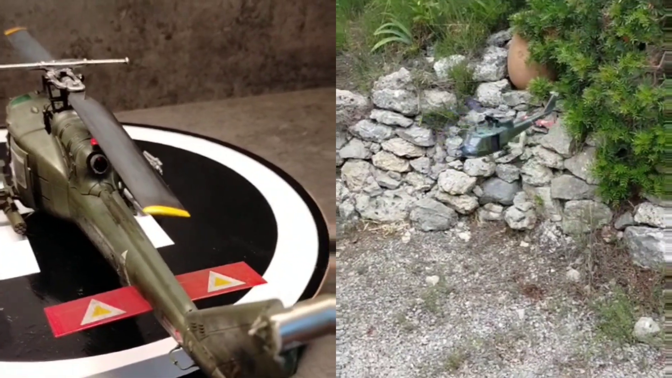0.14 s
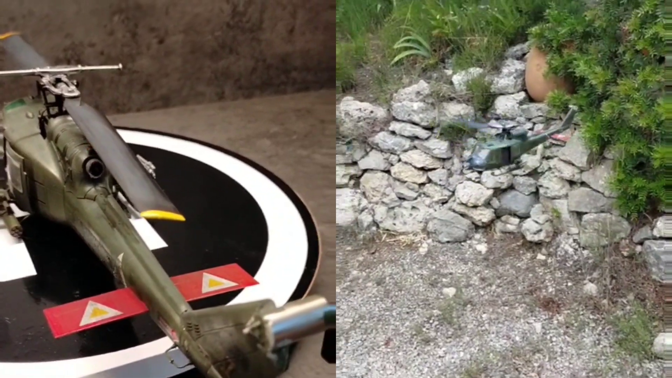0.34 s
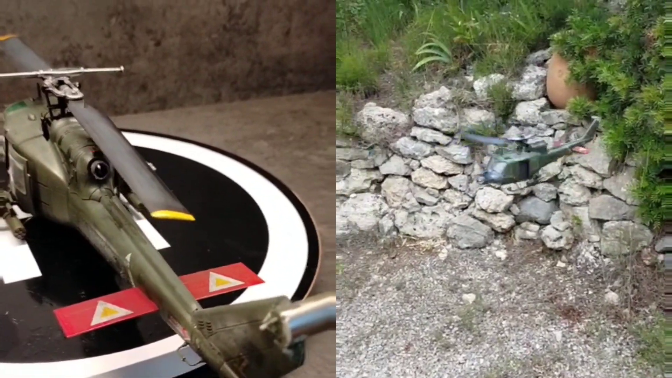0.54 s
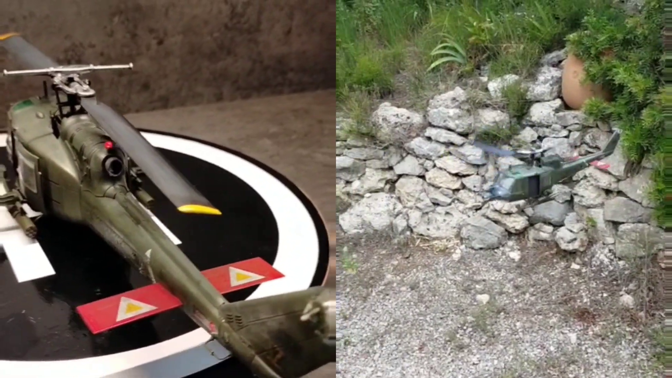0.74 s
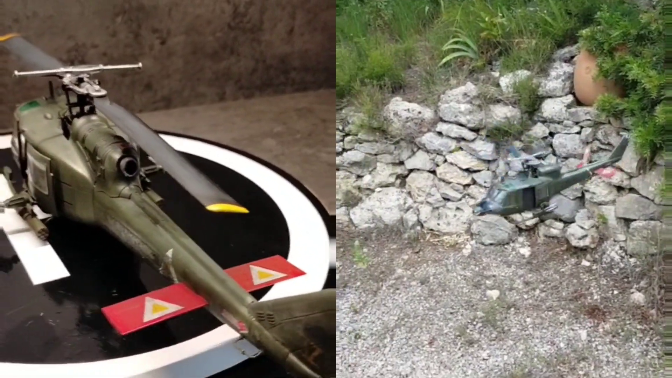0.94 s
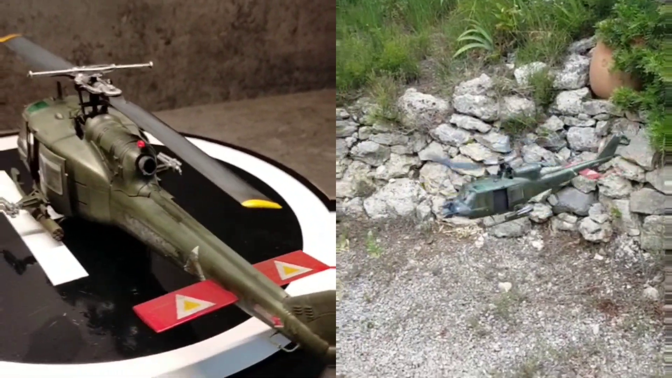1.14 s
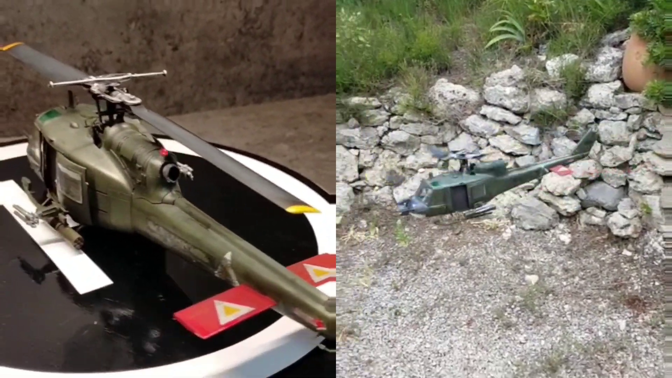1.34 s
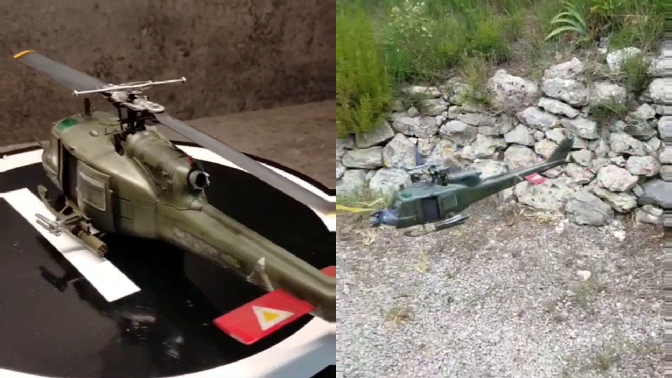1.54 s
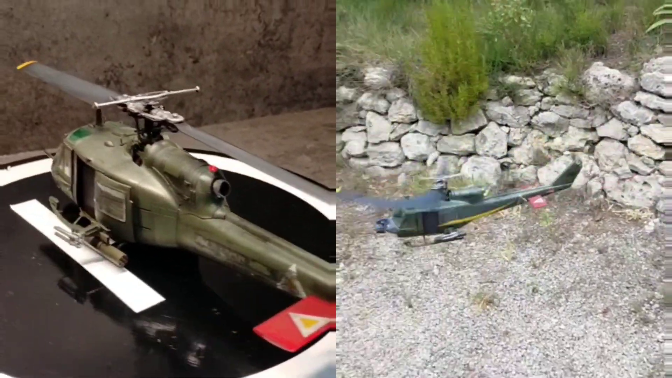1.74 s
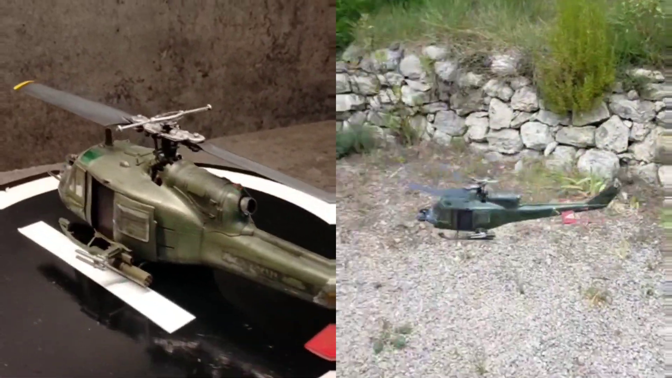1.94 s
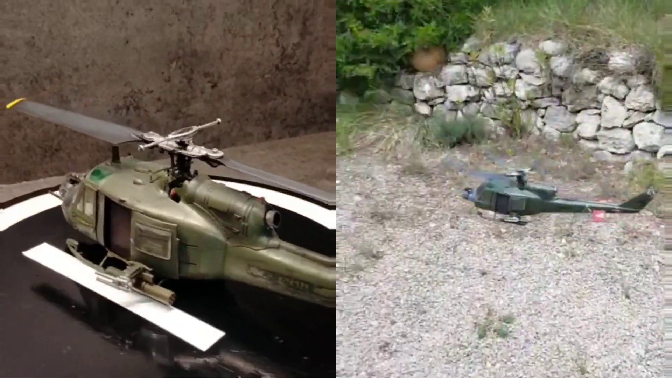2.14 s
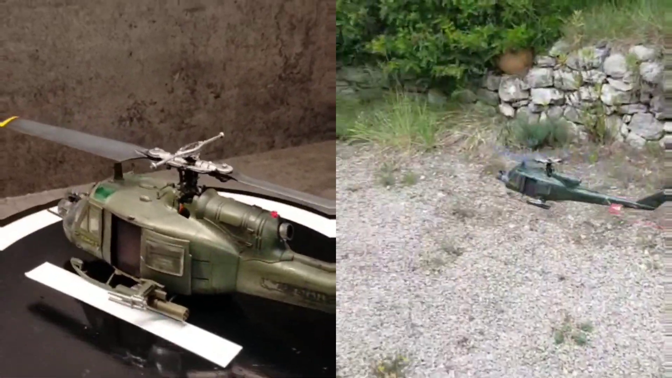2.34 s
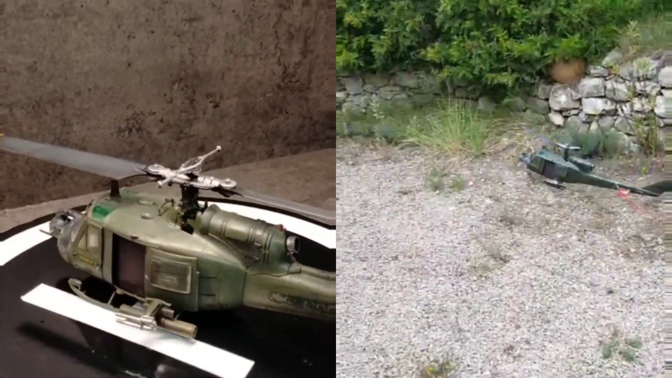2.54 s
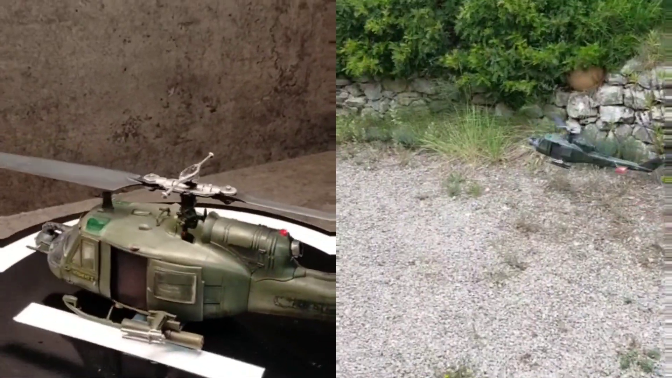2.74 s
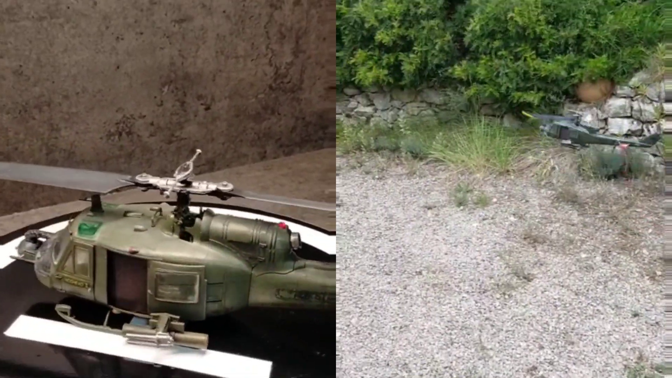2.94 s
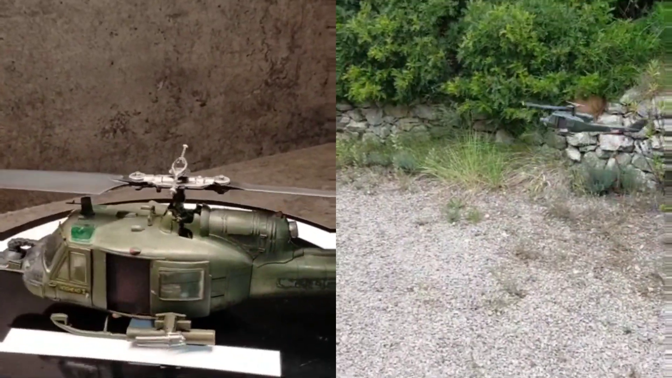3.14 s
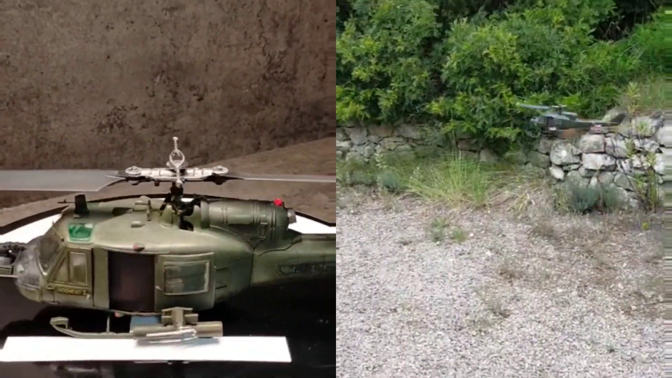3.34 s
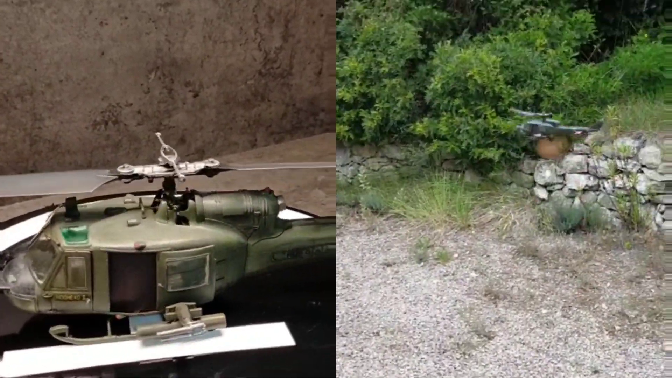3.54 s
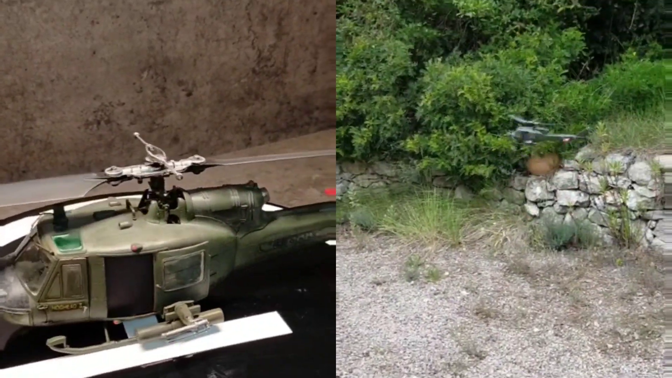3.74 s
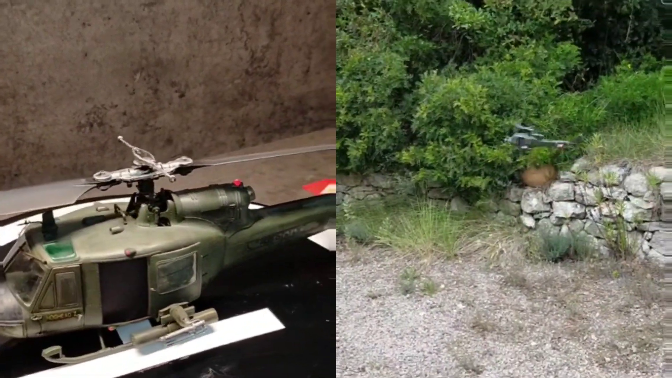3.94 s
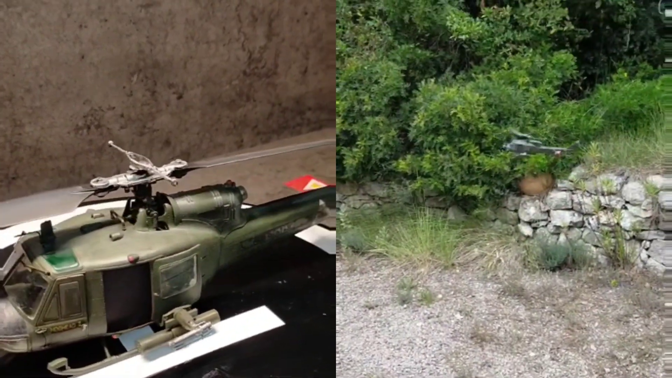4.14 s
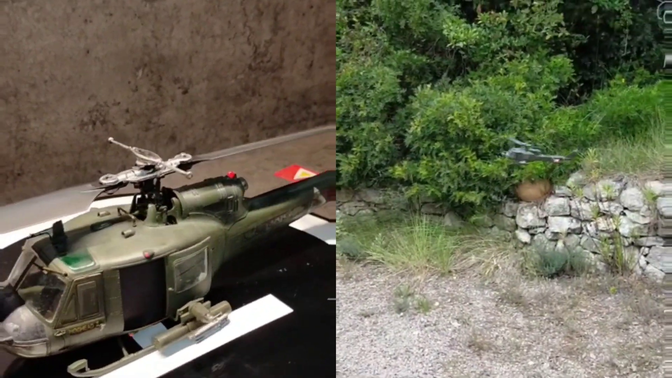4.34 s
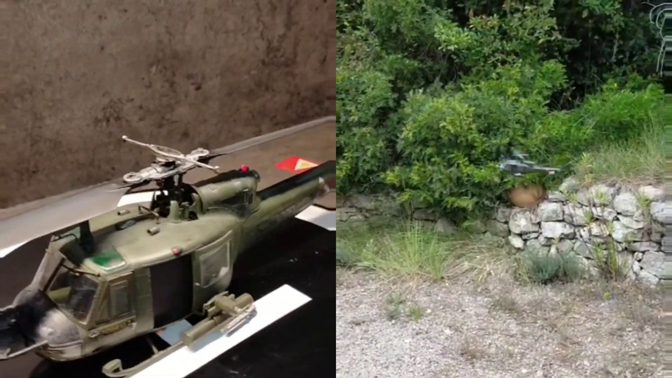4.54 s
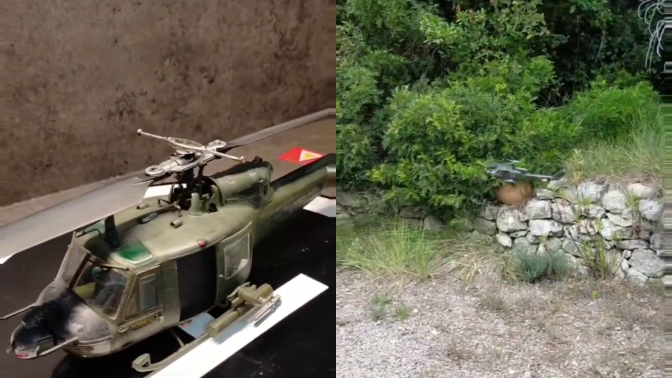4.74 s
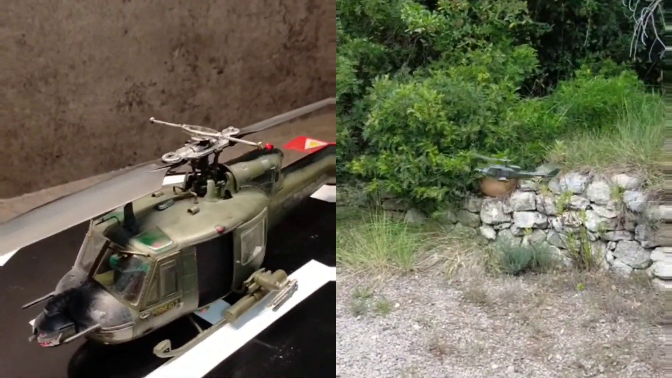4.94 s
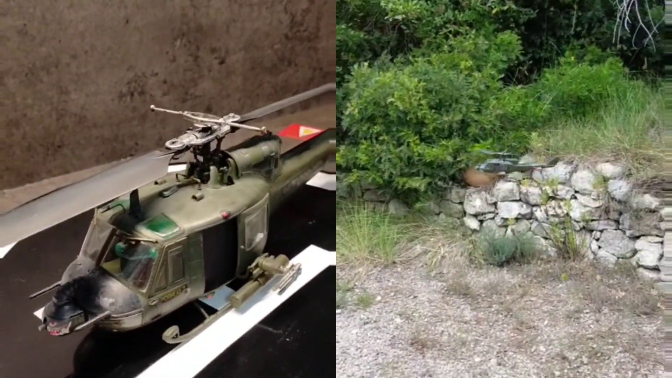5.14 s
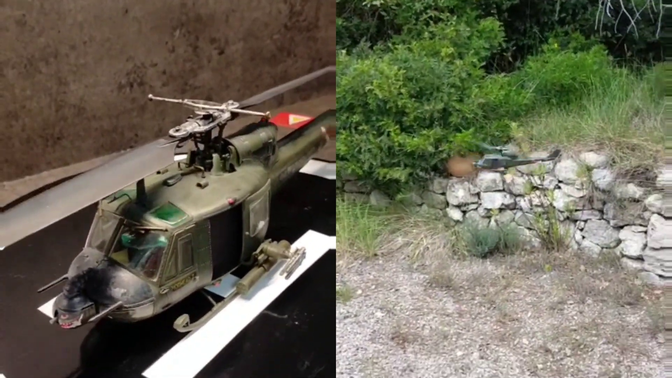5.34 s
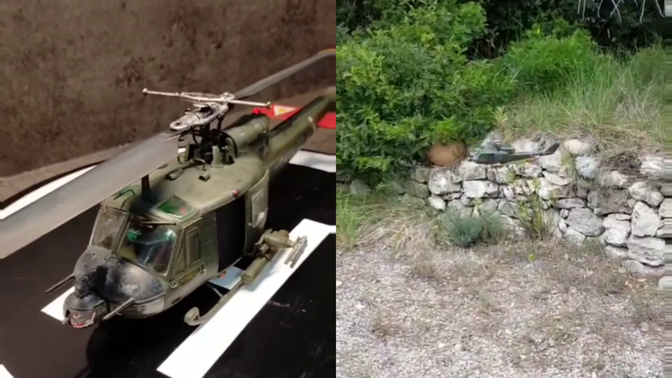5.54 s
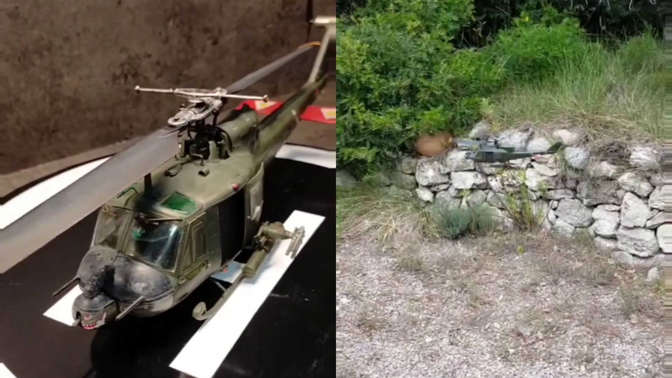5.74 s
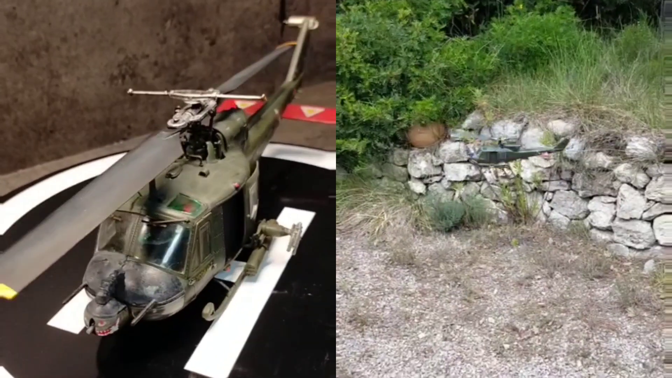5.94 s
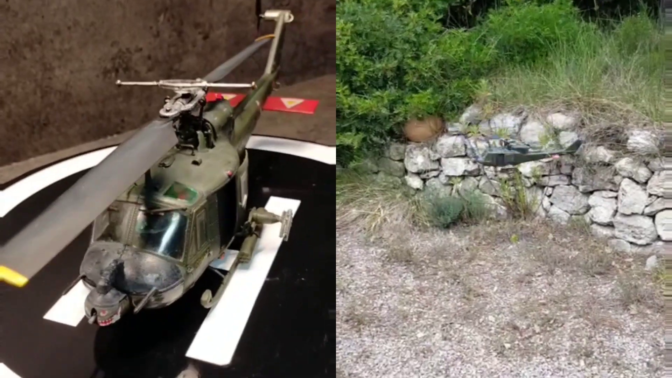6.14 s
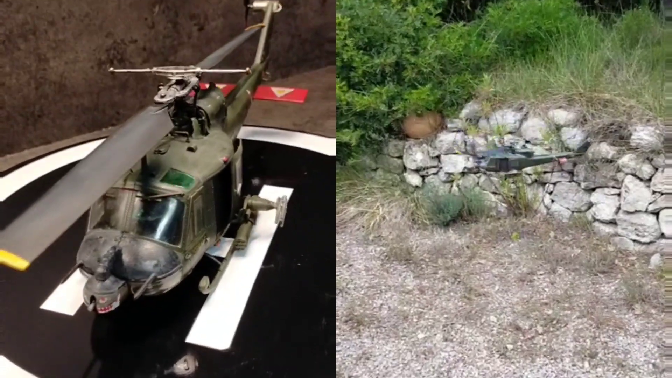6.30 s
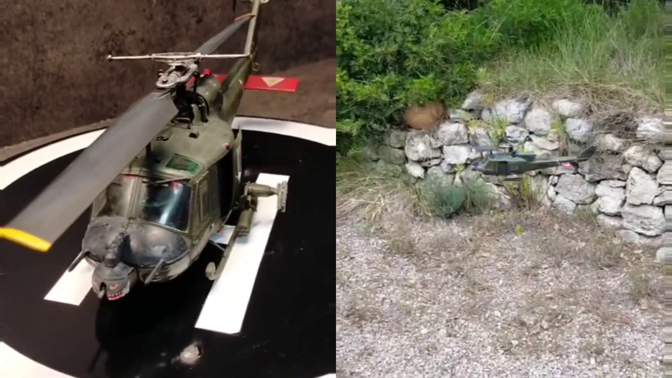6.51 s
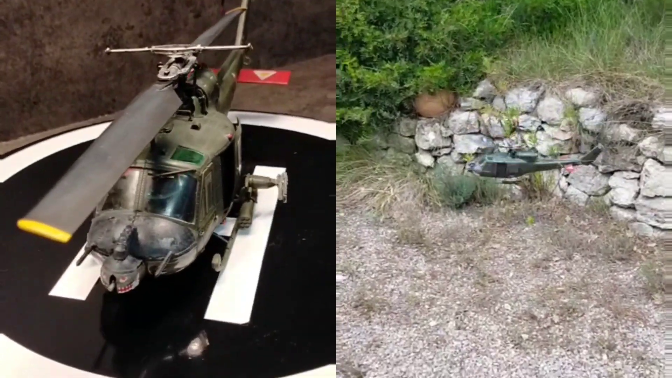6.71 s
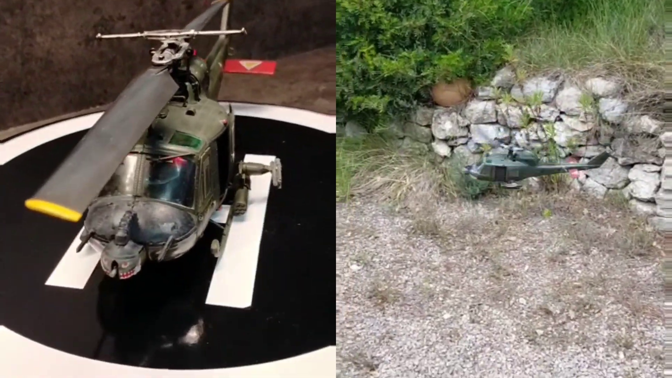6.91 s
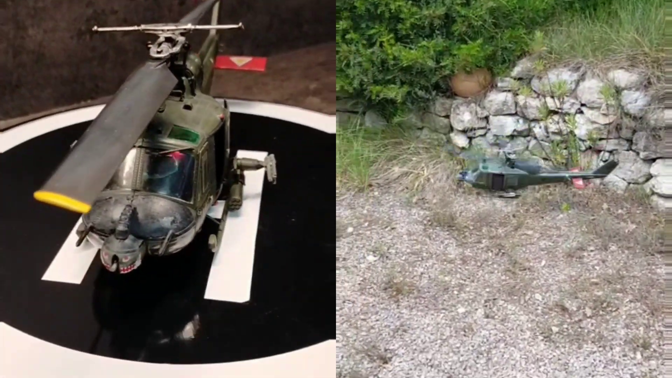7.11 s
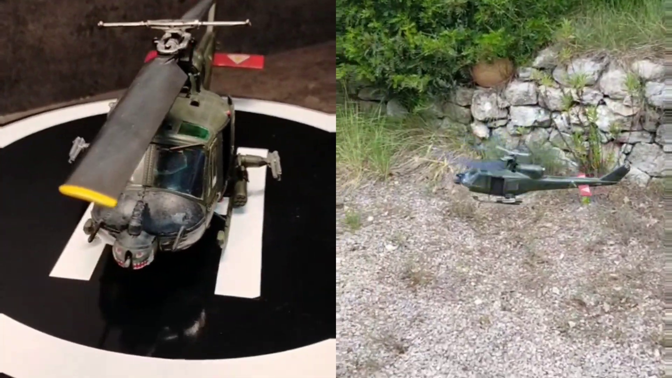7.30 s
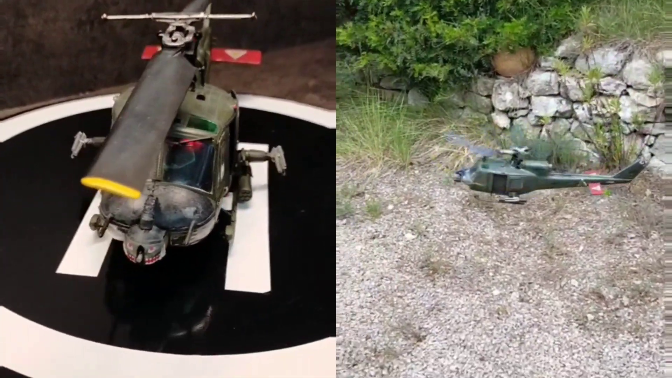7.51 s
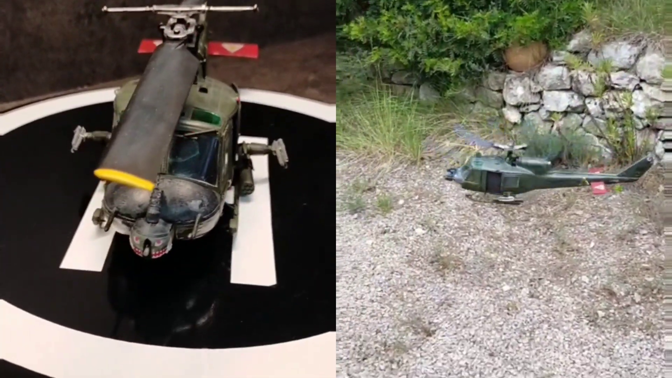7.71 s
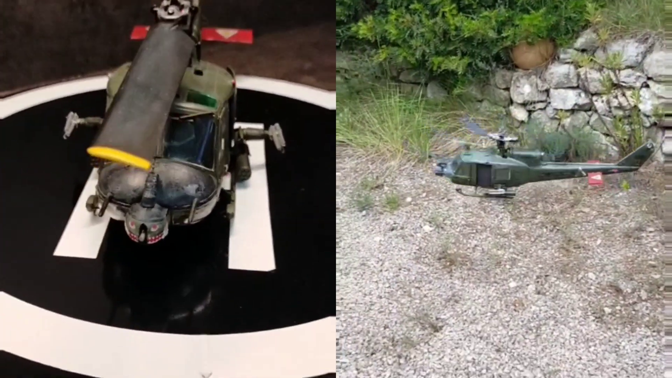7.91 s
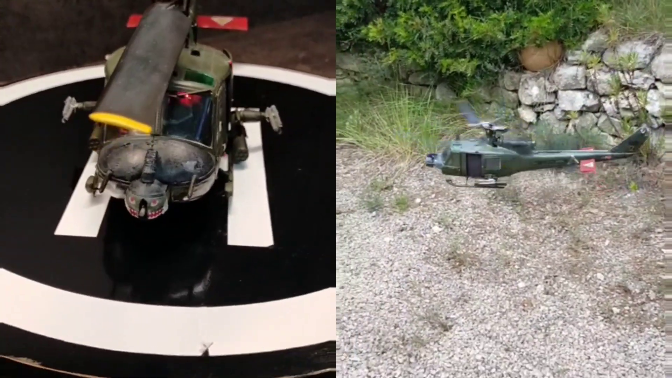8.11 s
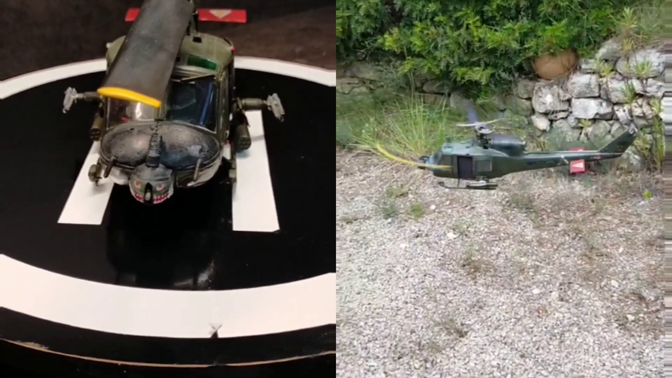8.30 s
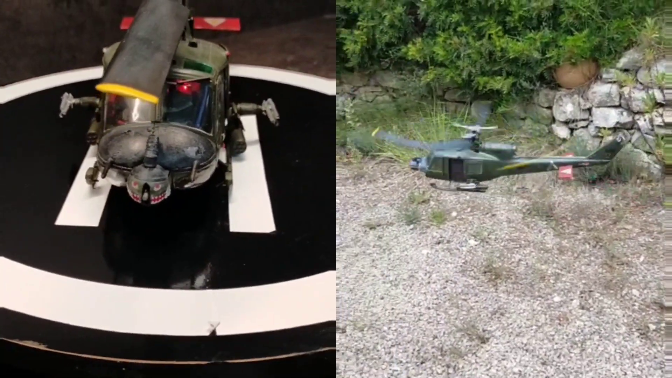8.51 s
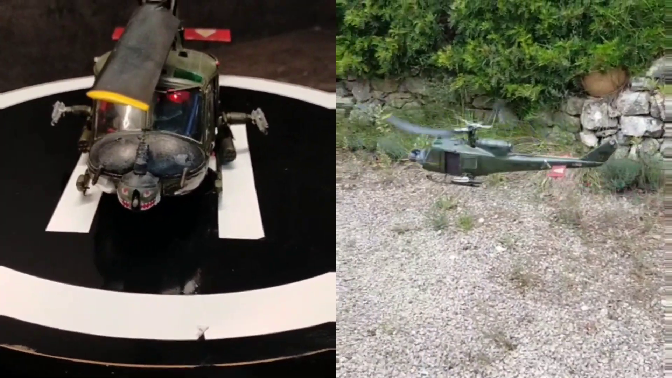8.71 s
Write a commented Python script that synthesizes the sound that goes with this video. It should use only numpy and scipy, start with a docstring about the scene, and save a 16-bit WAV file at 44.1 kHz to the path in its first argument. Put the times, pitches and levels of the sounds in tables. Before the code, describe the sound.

A small electric model helicopter flies outdoors with a high whine and whirring rotor blades, while wind gusts buffet the microphone.

```python
"""Outdoors over gravel: a small electric model helicopter drifts near and far.
One motor drives the two-blade main rotor through an 8:1 gear, so whine, blade slaps, rattle,
chopped air hiss and a low thrum all lock to the rotor. A separate tail rotor hunts in pitch
as it steers. Gusts buffet the microphone."""
import sys
import numpy as np
from scipy import signal
from scipy.fft import rfft, irfft, next_fast_len
from scipy.io import wavfile
from scipy.ndimage import uniform_filter1d

SR = 44100
rng = np.random.default_rng(int(sys.argv[2]) if len(sys.argv) > 2 else 0)


def wav_record(signal):
    """Record a signal, one row per channel, as 16-bit PCM in the file named by sys.argv[1]."""
    frames = np.transpose(np.atleast_2d(signal))
    bounded = np.clip(frames, -1, 1)
    # unit amplitude maps onto the largest positive 16-bit level
    quanta = np.round(bounded * 32767).astype(np.int16)
    wavfile.write(sys.argv[1], SR, quanta)


N = 386310
TIME = np.arange(N) / SR
FRAMES = TIME[::64]


def gain_of(db):
    return 10 ** (db / 20)


def unit_rms(x):
    return x / np.sqrt(np.mean(x ** 2) + 1e-20)


def curves(rows):
    """One signal per column after the time."""
    times_s, *columns = np.transpose(rows)
    return [np.interp(TIME, times_s, column) for column in columns]


def colour(x, eq):
    """Filter by (frequency [Hz], gain [dB]) points; output rms 1."""
    size = next_fast_len(N + 4096)
    hz, db = np.transpose(eq)
    bin_db = np.interp(np.log(np.fft.rfftfreq(size, 1 / SR) + 1), np.log(hz + 1), db)
    return unit_rms(irfft(rfft(x, size) * gain_of(bin_db), size)[:N])


def drift(hz):
    """Slow noise of rms 1, low-passed at hz."""
    knots_s = np.linspace(0, N / SR, 4096)
    spectrum = rfft(rng.standard_normal(len(knots_s)))
    bin_hz = np.arange(len(spectrum)) * SR / N
    return np.interp(TIME, knots_s, unit_rms(irfft(spectrum / (1 + (bin_hz / hz) ** 4))))


def crossfade(hz, count):
    """Drifting weights whose squares sum to 1."""
    weights = np.array([drift(hz) for _ in range(count)])
    return weights / np.sqrt((weights ** 2).sum(0))


def tone(cycles, rms_db, waver_rad):
    """Sine with wavering phase."""
    phase = 2 * np.pi * (cycles + rng.random()) + waver_rad * drift(6.5)
    return np.sqrt(2) * gain_of(rms_db) * np.cos(phase)


def pulse(rise_s, fall_s):
    """Lopsided Gaussian envelope."""
    t = np.arange(-500, 501) / SR
    return np.exp(-.5 * (t / np.where(t < 0, rise_s, fall_s)) ** 2)


def blade_passes(turns, lag_s=.00015, jitter_s=.00001, spread_db=1.6):
    """One click per pass; the second blade runs slightly late."""
    # slap strength by side shown: (time [s], first blade [dB], second blade [dB])
    bite = [(0, -6.5, -6), (.5, -3.5, -2.5), (1, -3, -7), (1.3, -2, -10), (1.6, 1.5, -15), (2, -1, -5),
            (2.4, -4.5, -1.5), (3, -2, -3), (3.6, -4, -5), (4.4, -5, -18), (5, -2.5, -2), (5.8, 2, -4.5),
            (6.6, 0.5, -4), (7.4, -1, -6), (8.1, 3, -1.5), (8.76, -4, -3.5)]
    at = np.flatnonzero(np.diff(np.floor(2 * (turns - .41))))
    blade = np.arange(len(at)) % 2
    timing, strength = rng.standard_normal((len(at), 2)).T
    bite_db = np.array(curves(bite))[blade, at]
    at += np.round((blade * lag_s + jitter_s * timing) * SR).astype(int)
    clicks = np.zeros(N)
    clicks[np.clip(at, 0, N - 1)] = gain_of(bite_db + spread_db * strength)
    return clicks


def slaps(clicks):
    """Each pass fires a short noise burst; four bursts cross-fade as the machine drifts."""
    # slap spectrum: (frequency [Hz], gain [dB])
    slap_eq = [(500, -35), (800, -12), (1400, -15.5), (2500, -1), (4000, -5), (5500, -3), (7100, -10.5),
               (7550, 12), (8000, 0), (10000, -25), (12000, -4.5), (14000, 10.5), (15000, 8), (16000, 0)]
    envelope = pulse(rise_s=.0009, fall_s=.0004)
    bursts = rng.standard_normal((4, len(envelope))) * envelope
    train = sum(signal.oaconvolve(clicks * weight, unit_rms(burst), "same")
                for weight, burst in zip(crossfade(hz=1.85, count=4), bursts))
    return colour(train, slap_eq)


def gear_rattle(turns, mismatch=.42):
    """Tooth errors repeat with rotor angle, nearly alike each half turn; five patterns cross-fade."""
    # drivetrain spectrum: (frequency [Hz], gain [dB])
    rattle_eq = [(500, -45), (800, -4.5), (1050, 4), (1180, -29), (1350, 5.5), (2600, -3.5), (4100, -2),
                 (5500, -4), (7000, -17), (7550, -1), (8600, -40), (10000, -2.5), (12000, 0.5), (14000, 19),
                 (16000, 7.5)]
    angle_turns = np.arange(1024) / 1024
    half_turn = rng.standard_normal((5, 512))
    patterns = np.tile(half_turn, 2) + mismatch * rng.standard_normal((5, 1024))
    errors = sum(weight * np.interp(turns % 1, angle_turns, pattern)
                 for weight, pattern in zip(crossfade(hz=1.6, count=5), patterns))
    return colour(errors, rattle_eq)


def air_hiss(turns, clicks):
    """Rushing air, chopped by each pass and louder in one half of the turn."""
    # air spectrum: (frequency [Hz], gain [dB])
    hiss_eq = [(180, -24.5), (300, -26), (767, -19), (967, -11.5), (1780, -11), (2000, -10.5),
               (2470, -13.5), (2920, -7.5), (4050, -14), (5020, -5), (6220, -8), (7580, -1.5), (10200, -21),
               (13100, -1), (15400, -1)]
    chop = unit_rms(signal.oaconvolve(clicks, pulse(rise_s=.0012, fall_s=.0006), "same"))
    envelope = 1 + .083 * chop + .19 * np.sin(2 * np.pi * turns)
    hiss = colour(envelope * rng.standard_normal(N), hiss_eq)
    return gain_of(.74 * drift(20)) * hiss


def ground_echoes(x, depth_db=1.5):
    """Ground echoes as random lifts and dips of bands, shifting as the machine moves."""
    spectra = signal.stft(x, nperseg=512)[2]
    patches = rng.standard_normal(spectra.shape)
    for _ in range(2):  # patches about 500 Hz by 0.5 s
        patches = uniform_filter1d(patches, size=4, axis=0)
        patches = uniform_filter1d(patches, size=60, axis=1)
    return signal.istft(spectra * gain_of(depth_db * unit_rms(patches)), nperseg=512)[1][:N]


def distance(x, near_db, top_db, dull_db):
    """Level follows nearness; two treble bands also vary as the body turns."""
    below_dull, below_top = (signal.sosfiltfilt(signal.butter(6, hz, fs=SR, output="sos"), x)
                             for hz in (9000, 11900))
    body = gain_of(-2.5) * unit_rms(below_dull)
    dull = gain_of(dull_db + 1) * unit_rms(below_top - below_dull)
    top = gain_of(top_db + 3.5) * unit_rms(x - below_top)
    return gain_of(near_db) * (body + dull + top)


def pole_whine(turns, near_db, shade):
    """Three-pole motor, 24 cycles per rotor turn; its overtones beam in different directions."""
    # whine tones: (order [cycles/turn])
    orders = (24, 48, 72, 120, 144, 168, 216, 288)
    # per order: (gain [dB], slope [dB/shade])
    gains = [(-20.5, -8.5), (-22.5, 4.5), (-11.5, 0.2), (-13, 0.5), (-12, 1.3), (-13.5, 1), (-21.5, 4.1),
             (-20, -1)]
    # lone swells and fades, one list per order: (time [s], sigma [s], gain [dB])
    swell_lists = [
        [(.2, 0.31, 9), (.65, 0.075, -9), (1.75, 0.28, 15), (2.75, 0.27, -18), (8.5, 0.4, 9)],
        [(.3, 0.55, 5), (1.9, .2, -18), (4.6, 0.36, -8), (7.65, 0.083, -7)],
        [(.6, 0.58, -1.5), (1.8, 0.072, -11), (2.8, 0.046, -5), (5.1, .3, 2.5), (6.17, 0.066, -6),
         (7.1, .2, -2.5), (7.7, 0.28, 6), (8.35, 0.25, 5)],
        [(.35, 0.36, -16), (1.6, 0.32, 2), (4.15, 0.086, -8), (5.2, 0.25, -3), (8.6, 0.35, 2)],
        [(2.4, 0.33, -10), (4.15, 0.25, 5.5), (5.4, .25, 9.5), (6.45, 0.14, 4.5)],
        [(1.6, 0.31, 5), (6.1, 0.59, 7), (7.85, 0.13, 5.5), (8.6, 0.17, -8)],
        [(.2, .3, 9), (1.1, .15, -6), (3.35, 0.3, -6), (8.5, .3, 10)],
        [(2.0, 0.2, 17), (4.75, 0.31, 12), (7.15, .2, 6), (8.1, .15, -13)],
    ]
    whine = 0
    for order, (gain_db, shade_db), swells in zip(orders, gains, swell_lists):
        swell_db = sum(db * np.exp(-.5 * ((FRAMES - at_s) / sigma_s) ** 2)
                       for at_s, sigma_s, db in swells)
        level_db = near_db + gain_db + shade_db * shade + 1.1 * drift(1.1)
        level_db += np.interp(TIME, FRAMES, swell_db)
        skirt = drift(110) * tone((order - 2.5) * turns, level_db - 25, waver_rad=.25)
        whine += tone(order * turns, level_db + 1.6 * drift(9), waver_rad=.35) + skirt
    return whine


def motor(turns, near_db, top_db, shade):
    """Whine and shaft tones; the gear wobbles them once and twice a turn, adding sidebands."""
    # shaft harmonics: (order [cycles/turn], gain [dB])
    shaft_tones = [(16, -37.1), (32, -24.5), (40, -29), (64, -28), (80, -30), (88, -29), (96, -24.6),
                   (128, -22.0), (136, -18.0), (152, -21.3), (160, -22.0), (176, -25.5), (184, -25),
                   (192, -24), (200, -22.6), (208, -28.8), (232, -33.8), (240, -31.2), (256, -35.9),
                   (264, -26.8), (272, -29.9), (280, -27.9)]
    # shaft harmonics in the top band: (order [cycles/turn], gain [dB])
    sizzle_tones = [(312, -27), (328, -27), (336, -24), (352, -23), (360, -20)]
    once, twice = (np.cos(2 * np.pi * (k * turns + rng.random())) for k in (1, 2))
    wobble = 1 + .25 * once + .3 * twice
    turns = turns + .0003 * drift(34) + .0004 * once + .0002 * twice  # speed flutter
    whine = pole_whine(turns, near_db, shade)
    shaft = sum(tone(order * turns, near_db + db + .5 + 3 * drift(1.2), waver_rad=.3)
                for order, db in shaft_tones)
    sizzle = sum(tone(order * turns, near_db + top_db + db + 3.5 * drift(1.5), waver_rad=.7)
                 for order, db in sizzle_tones)
    return wobble * (whine + shaft + sizzle)


def thrum(turns):
    """Lift of the passing blades: a faint low hum."""
    # hum envelope: (time [s], level [dB])
    levels = [(0, -63), (.5, -64), (1, -54.5), (2.2, -54.5), (2.6, -58.5), (3.5, -62.5), (5, -63),
              (6, -63.5), (7, -60), (8.4, -58.5), (8.76, -54)]
    # blade-pass harmonics: (order [cycles/turn], gain [dB])
    harmonics = [(2, -0.5), (4, -11.5), (6, -12.5), (8, -11), (12, -22)]
    level_db, = curves(levels)
    return sum(tone(order * turns, level_db + db + 2.8 * drift(11), waver_rad=.22)
               for order, db in harmonics)


def tail_rotor(near_db, shade, rest_hz=490, hunt_hz=2.5):
    """Tail blade tones hunt with the steering; overtones grow louder with speed."""
    # steering: (time [s], blade-pass rate [Hz])
    rates = [(0, 471), (0.15, 474), (0.29, 500), (0.41, 468), (0.6, 534), (0.8, 501), (0.96, 506),
             (1.2, 489), (1.4, 430), (1.55, 502), (1.77, 540), (1.91, 495), (2.13, 488), (2.21, 503),
             (2.36, 483), (2.5, 478), (2.58, 458), (2.72, 545), (2.8, 498), (3.17, 484), (3.39, 484),
             (3.5, 455), (3.68, 463), (3.83, 505), (3.99, 464), (4.12, 482), (4.42, 482), (4.5, 519),
             (4.64, 518), (4.72, 542), (4.86, 504), (5.01, 504), (5.1, 490), (5.23, 512), (5.37, 513),
             (5.52, 485), (5.7, 491), (5.96, 478), (6.09, 521), (6.33, 480), (6.63, 490), (6.7, 483),
             (6.85, 537), (7.01, 552), (7.07, 533), (7.21, 543), (7.36, 525), (7.46, 546), (7.56, 516),
             (7.71, 555), (8.02, 493), (8.1, 504), (8.24, 479), (8.39, 530), (8.47, 517), (8.61, 530),
             (8.76, 503)]
    # overtones: (order [cycles/pass])
    orders = (2, 3, 4, 6, 8)
    # per order: (gain [dB], slope [dB/shade], slope above rest [dB/Hz])
    gains = [(-21.5, -2.5, .05), (-38, -1, .03), (-23, 2.5, .05), (-20.5, -1.2, .045), (-33, 2.5, .05)]
    # fundamental: (time [s], level [dB])
    hum_levels = [(0, -63), (.5, -60), (.7, -73), (1.3, -59), (1.7, -71), (2.1, -63), (3.0, -67.5),
                  (3.7, -82), (5.7, -84), (6.8, -70), (8.0, -72), (8.76, -82)]
    pass_hz = curves(rates)[0] + hunt_hz * drift(9.86)
    passes = np.cumsum(pass_hz) / SR
    overtones = 0
    for order, (gain_db, shade_db, db_per_hz) in zip(orders, gains):
        level_db = near_db + gain_db + shade_db * shade + db_per_hz * (pass_hz - rest_hz)
        flicker_db = 1.5 * drift(1.4) + 3 * drift(16)
        overtones += tone(order * passes, level_db + flicker_db, waver_rad=.19 * order)
    return overtones + tone(passes, curves(hum_levels)[0] + 3 * drift(16), waver_rad=.17)


def wind(rise_db_per_s=269, fall_db_per_s=204, lull_db=-60.5):
    """Gusts on the microphone: lumpy rumble, plus sharper flaps when strong."""
    # gust crests: (start [s], hold [s], level [dB])
    gusts = [(.25, .3, -59), (0.856, 0.14, -52), (1.045, 0.2, -37), (1.278, 0.24, -36.5),
             (1.577, 0.018, -41.5), (1.78, .01, -42), (1.85, .01, -40.5), (1.93, .01, -34.5),
             (2.007, 0.027, -41.5), (2.12, .4, -61), (2.836, .04, -28.5), (2.95, 0.17, -42),
             (3.116, 0.15, -33.5), (3.28, 0.13, -27), (3.5, 0.053, -30), (3.6, 0.055, -36),
             (3.918, 0.049, -31.5), (3.987, .06, -29.5), (4.125, .01, -27.5), (4.207, 0.16, -28),
             (4.47, .06, -35), (4.82, .01, -38), (4.95, .01, -41), (5.127, 0.021, -37.5),
             (5.224, 0.046, -43.5), (5.36, .09, -48), (5.502, .01, -39), (5.578, .01, -43.5),
             (5.8, 0.12, -45.5), (5.98, 0.088, -41.5), (6.343, 0.22, -47.5), (6.98, 0.025, -42.5),
             (7.08, 0.062, -57), (7.486, .01, -39.5), (7.65, 0.0089, -33), (7.75, 0.095, -42),
             (8.0, 0.0091, -35), (8.09, .07, -36.5), (8.217, 0.056, -35.5), (8.615, 0.0091, -38),
             (8.688, .05, -43)]
    # rumble and flap spectra: (frequency [Hz], gain [dB])
    rumble_eq = [(15, 1), (45, -0.1), (90, -7.5), (150, -18), (300, -43)]
    flap_eq = [(40, -26), (120, 3.3), (220, -7.5), (400, -20.5), (700, -43.5)]
    gust_db = np.full(len(FRAMES), lull_db)
    for start_s, hold_s, crest_db in gusts:
        before_db = rise_db_per_s * np.maximum(start_s - FRAMES, 0)
        after_db = fall_db_per_s * np.maximum(FRAMES - start_s - hold_s, 0)
        gust_db = np.maximum(gust_db, crest_db - before_db - after_db)
    level_db = np.interp(TIME, FRAMES, gust_db) + 1.13 * drift(11)
    rumble = colour(rng.standard_normal(N) * gain_of(2.3 * drift(21)), rumble_eq)
    flaps = colour(rng.standard_normal(N) * gain_of(4.5 * drift(30)), flap_eq)
    flap_db = -10.5 + .77 * (level_db + 31.5)
    return gain_of(level_db) * (rumble + gain_of(flap_db) * flaps)


def scene():
    """Helicopter and wind, mono."""
    # main rotor: (time [s], speed [turns/s])
    speeds = [(0, 39.2), (0.4, 39.62), (0.7, 40.18), (0.9, 40.7), (1.1, 40.98), (1.2, 40.8), (1.5, 39.78),
              (1.6, 39.75), (1.8, 40.5), (1.95, 40.8), (2.3, 40.52), (2.9, 40.84), (3.0, 40.72),
              (3.15, 40.13), (3.5, 39.93), (3.8, 40.13), (4.35, 39.9), (4.7, 40.63), (4.9, 40.95),
              (5.2, 40.33), (5.4, 40.15), (5.75, 40.93), (6.0, 40.7), (6.2, 40.7), (6.4, 40.42),
              (6.8, 40.32), (7.0, 40.69), (7.3, 40.79), (7.8, 40.48), (8.25, 39.95), (8.55, 40.32),
              (8.76, 40.35)]
    # nearness: (time [s], level [dB], trim above 11.9 kHz [dB], trim at 9-11.9 kHz [dB])
    nearness = [(0, -33.5, 2.5, -11), (.5, -31.5, -1.5, -10.5), (.85, -29.5, 3.5, -13),
                (1.18, -30, 3.5, -11), (1.4, -30, 0, -9), (1.7, -28, 3, -8.5), (2.05, -28.5, 2, -10.5),
                (2.4, -29.5, 0.5, -16), (2.72, -31.5, 4.5, -15), (3.3, -35.7, 3, -15),
                (3.95, -36.5, 0.5, -14.5), (4.6, -36.5, 0.2, -11.5), (5.2, -36.5, 0, -9.5),
                (5.9, -34.5, -1, -12), (6.2, -34.5, 1, -11), (6.4, -33, 4.5, -15), (6.6, -33, 1.5, -14),
                (7.2, -30, 2, -13), (7.7, -29.5, 3, -12.5), (8.25, -29.5, 3, -16), (8.5, -28.5, 2, -15),
                (8.76, -29, 1.5, -12)]
    # tone colour, low values favour the lowest whine tone: (time [s], shade [-])
    shades = [(0, -0.13), (.35, 0.089), (.65, 0.47), (1.3, 0.15), (1.9, 2.05), (2.35, -0.9), (3.0, -1.6),
              (3.55, -1.35), (4.1, -0.49), (4.6, -.6), (4.9, 0.26), (5.4, -0.73), (6.0, 1.2), (6.4, .8),
              (6.9, 2), (7.4, 1.5), (7.9, 1), (8.2, 0.14), (8.76, -0.11)]
    turns = np.cumsum(curves(speeds)[0]) / SR
    near_db, top_db, dull_db = curves(nearness)
    shade, = curves(shades)
    clicks = blade_passes(turns)
    rush = gain_of(-6.5) * slaps(clicks)
    rush += gain_of(-6) * gear_rattle(turns)
    rush += gain_of(-.5) * air_hiss(turns, clicks)
    rush = distance(ground_echoes(rush), near_db, top_db, dull_db)
    tones = motor(turns, near_db, top_db, shade) + thrum(turns) + tail_rotor(near_db, shade)
    return (rush + tones + wind())[None]


def record(dry, edge_hz=15530):
    """Steep low-pass."""
    taps = signal.firwin(1023, edge_hz, window=("kaiser", 10), fs=SR)
    return signal.oaconvolve(dry, taps[None], "same")


dry = scene()
out = record(dry)
wav_record(out)
```